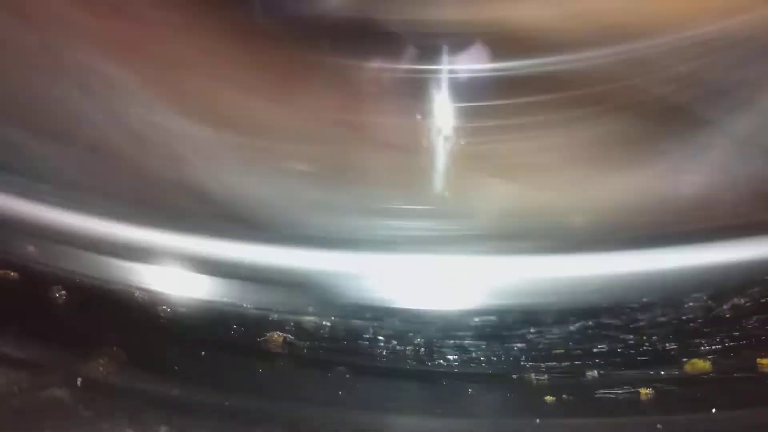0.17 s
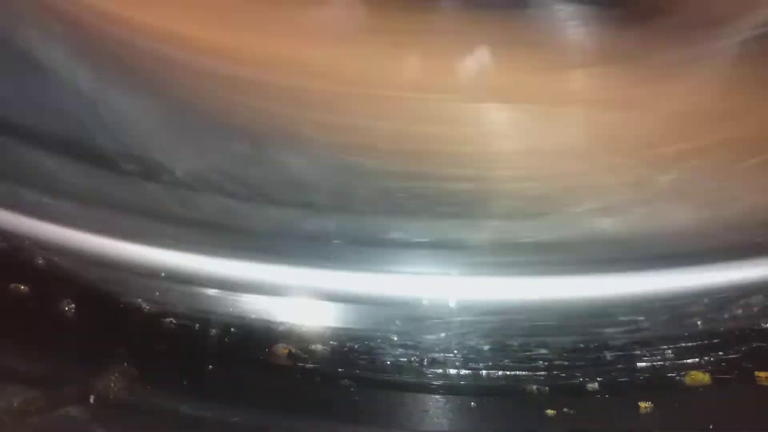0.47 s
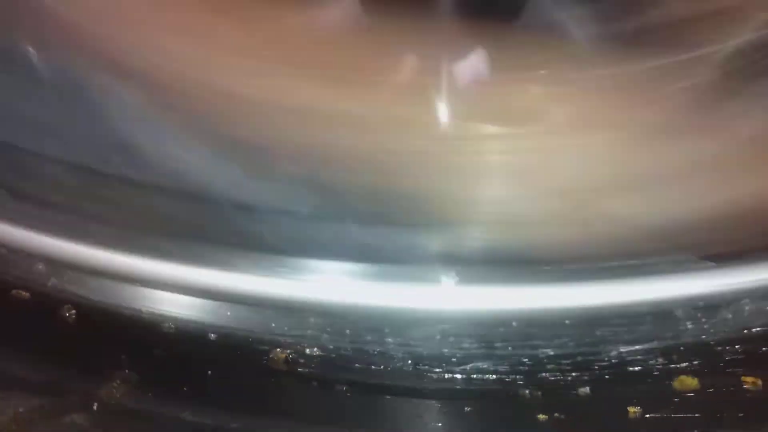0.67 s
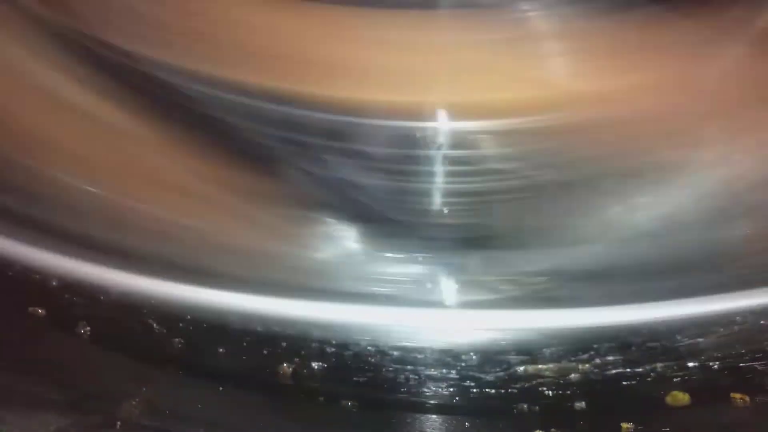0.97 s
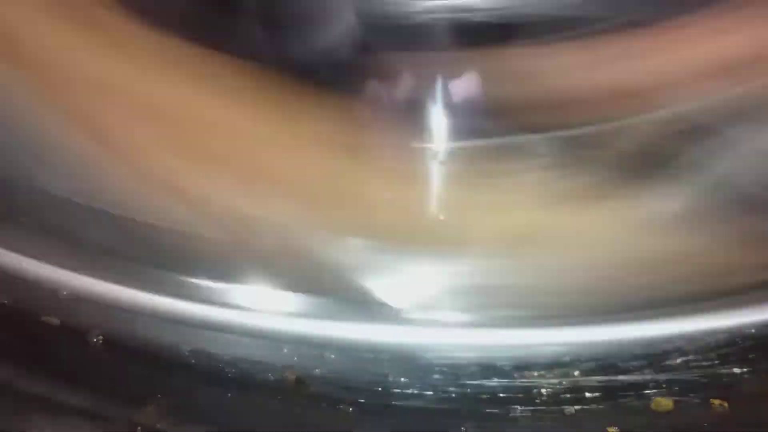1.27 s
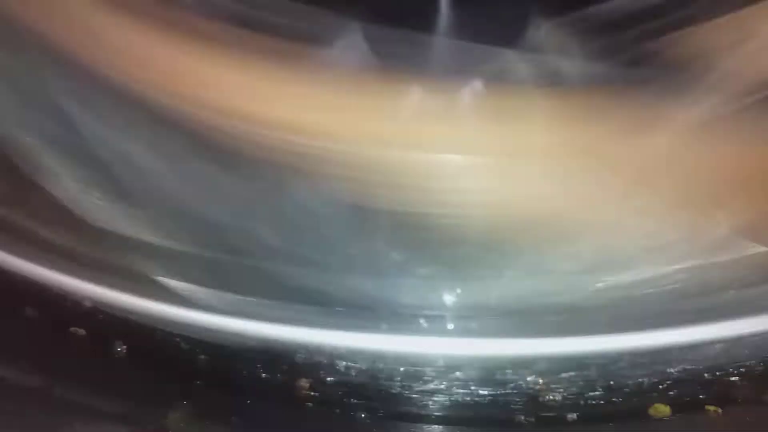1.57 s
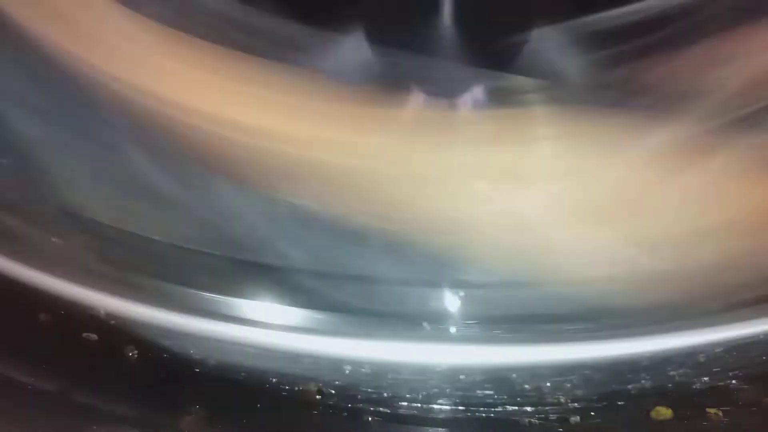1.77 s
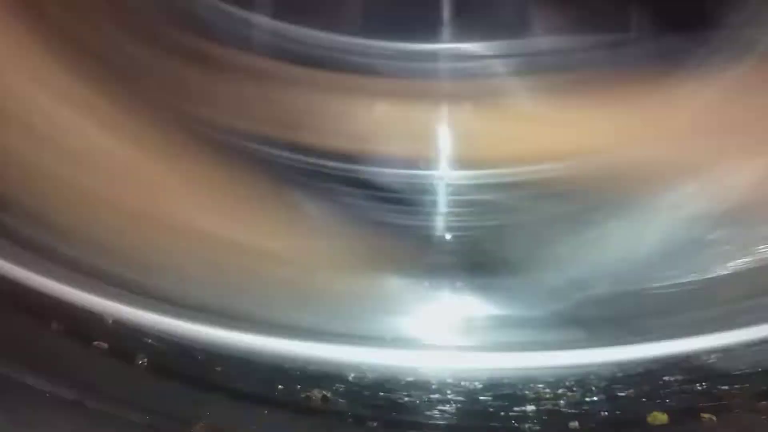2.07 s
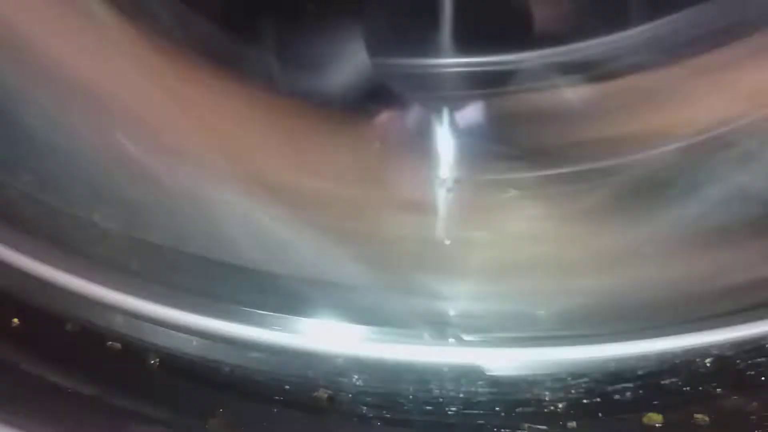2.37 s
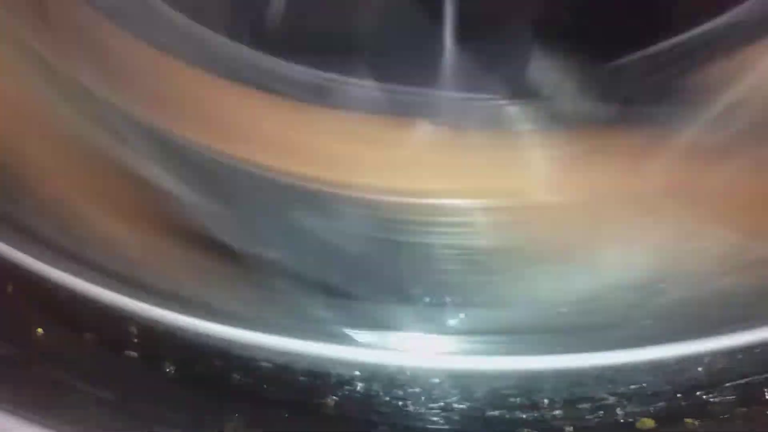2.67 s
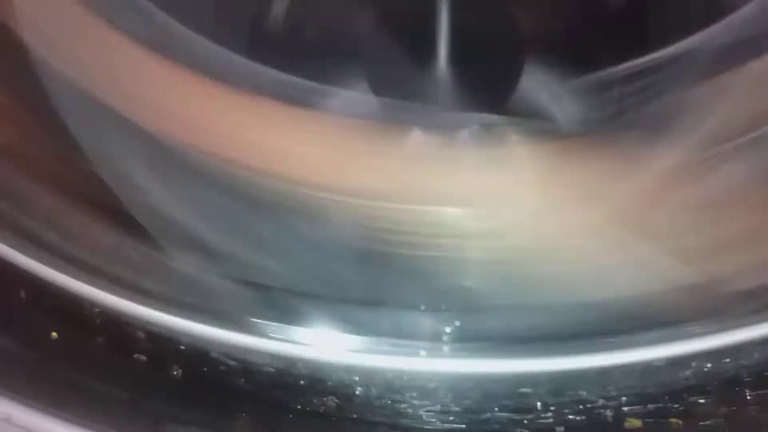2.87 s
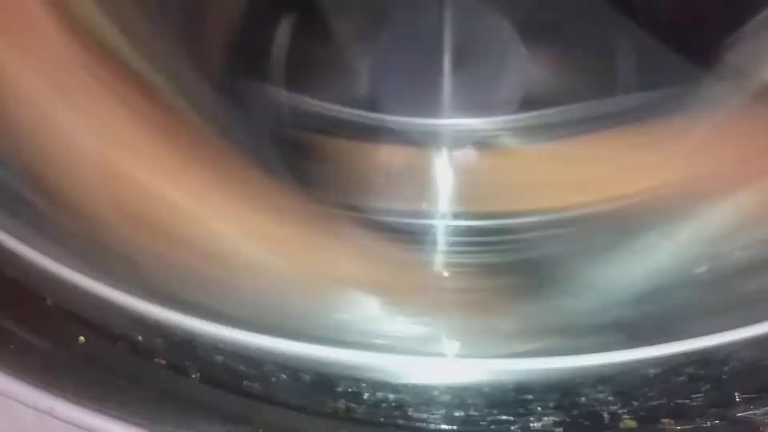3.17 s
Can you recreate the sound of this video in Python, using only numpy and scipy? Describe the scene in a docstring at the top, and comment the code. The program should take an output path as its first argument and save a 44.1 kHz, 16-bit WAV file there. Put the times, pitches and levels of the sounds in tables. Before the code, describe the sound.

Close over the rim of a steel honey extractor, mono: continuous droning hum and whirr pulsing with each turn, irregular small ticks and faint rattle, heavy low air buffeting mostly in the middle, easing later.

```python
"""The drive gear of a honey extractor hums as two sines, bent and swelled alike on each of about four turns a second.
Its roughness, noise that partly repeats each turn, rings the steel drum's resonances, heard from just over the rim.
Two frames whirr past as banded noise that swells with the turn, and tick and rattle as short ringing noise puffs.
Stirred air buffets the microphone with lumpy low noise and one-cycle thumps; the electronics whine as faint sines."""
import sys
import numpy as np
from scipy import signal
from scipy.fft import rfft, irfft
from scipy.io import wavfile

SR = 44100
rng = np.random.default_rng(int(sys.argv[2]) if len(sys.argv) > 2 else 0)


def generate_wav(sig):
    """Save sig (samples, or channels by samples) to the path in sys.argv[1] as 16-bit PCM at SR."""
    pcm = np.round(np.clip(np.atleast_2d(sig).T, -1, 1) * 32767).astype(np.int16)
    wavfile.write(sys.argv[1], SR, pcm)


def elevation(decibels):
    """Turn decibel levels (scalar or array-like) into linear amplitude ratios."""
    levels = np.asarray(decibels, float)
    return 10 ** (levels / 20)


N = 146853  # length in samples
TURNS_PER_S = 4.111

# electrical whine: multiple of WHINE_HZ, level_db (rms)
WHINE = [(1, -50.5), (2, -63), (4, -66), (5, -69), (6, -69), (7, -79), (11, -86), (13, -81), (14, -80),
         (15, -85)]
WHINE_HZ = 1000

# buffeting air on the microphone: time_s, deep_level_db, upper_level_db
WIND = [(0.0, -34.5, -35), (0.3, -35, -37.5), (0.5, -34, -34.5), (0.75, -26.5, -28.5), (0.95, -28, -29.5),
        (1.15, -26.5, -24.5), (1.33, -25, -28.5), (1.38, -40, -34.5), (1.47, -37, -33.5),
        (1.62, -30.5, -30), (1.75, -28.5, -34), (1.87, -28, -24.5), (1.94, -41, -34), (2.05, -27.5, -33),
        (2.25, -33.5, -35), (2.5, -31.5, -37), (2.8, -44.5, -40), (2.9, -38, -33.5), (3.02, -34, -45.5),
        (3.12, -41, -37), (3.33, -43, -53)]
# spectrum of the buffeting: pitch_hz, relative level_db (per Hz)
WIND_COLOUR = [(15, -58), (25, -31), (56, -0.5), (86, 2.5), (130, -0.5), (305, -6), (372, -12), (403, -22),
               (436, -9), (600, -12.5), (780, -31), (1320, -120)]
WIND_SPLIT_HZ, WIND_LUMP_DB, LUMP_RATE_HZ = 105, 0.5, 82

# single eddies thumping the microphone: centre_s, level_db (top of the envelope), pitch_hz
THUMPS = [(0.109, -18, 105), (.639, -18, 120), (0.668, -25, 115), (.736, -14, 96), (0.754, -22, 84),
          (0.777, -21, 116), (0.829, -11.5, 133), (.878, -16.5, 142), (0.921, -21, 147),
          (0.968, -13.5, 120), (1.012, -23, 100), (1.033, -22, 106), (1.083, -13, 100), (1.104, -13.5, 104),
          (1.124, -19, 122), (1.174, -12.5, 134), (1.21, -17.5, 105), (1.284, -14, 112),
          (1.306, -10.5, 134), (1.338, -21, 144), (1.421, -13, 120), (1.508, -13.5, 127), (1.545, -16, 146),
          (1.633, -24, 121), (1.717, -13.5, 96), (1.81, -12.5, 142), (1.864, -15.5, 178),
          (1.89, -18.5, 126), (1.966, -14.5, 112), (2.002, -20, 124), (2.163, -16.5, 134),
          (2.203, -25, 100), (2.228, -20.5, 137), (2.35, -16.5, 164), (2.361, -22, 111), (2.391, -27, 101),
          (2.456, -18, 123), (2.947, -24, 128), (2.995, -22, 88), (3.024, -23, 90.5), (3.24, -21, 90),
          (3.285, -22, 88)]
THUMP_RISE_CYCLES, THUMP_FALL_CYCLES = 1.05, 1.8

# clear frame ticks: start_s, level_db (of the click, before gain and ringing), top_db (treble against level_db)
TICKS = [(0.1074, -29, -4), (0.3945, -30, -9), (0.5905, -24, -11), (0.8305, -22, -17), (1.0051, -24.5, -14),
         (1.071, -21.5, -14), (1.1414, -28, -6), (1.3004, -29, -20), (1.5389, -19, -21), (1.701, -29, -11),
         (1.782, -19, -21), (2.1644, -36, -1), (2.5494, -21, -23), (2.779, -24, -17), (2.984, -20, -26),
         (3.024, -26, -12), (3.1073, -36, -1)]
TICK_GAIN_DB, TICK_RISE_S, TICK_FALL_S, TOP_FALL_S = -3, 0.00072, 0.0056, 0.0053
TICK_HZ, TICK_WIDTH_HZ, TOP_HZ, TOP_WIDTH_HZ = 4930, 1900, 13300, 3500
RATTLE_PER_S, RATTLE_FLOOR_DB, RATTLE_SPREAD_DB, RATTLE_FALL_S = 43, -51, 2.5, 0.0027

# spectrum of the whirr: pitch_hz, relative level_db (per Hz)
WHIRR_COLOUR = [(40, -17.5), (70, -8.5), (190, -14), (340, -16), (450, -21.5), (570, -23.5), (750, -14.5),
                (900, -18), (1400, -21), (2000, -26), (2700, -31.5), (4200, -35), (4800, -32),
                (5600, -35.5), (6400, -38.5), (7500, -51.5), (8800, -66.5), (10500, -56), (11500, -54),
                (13000, -47.5), (14500, -48), (16000, -54)]
# whirr swell as frames pass: from_hz, once_a_turn_db, peak_turn_share, twice_a_turn_db, peak_turn_share
FRAME_PASS = [(924, 0.94, 0.63, 1.5, 0.42), (1960, 0.95, 0.59, 1.43, 0.34), (3800, 0.84, 0.56, 1.5, 0.37),
              (7900, .6, 0.66, 1, 0.42)]
# slow level of the whirr's top band: time_s, level_db
TOP_LEVEL = [(0.0, 1.5), (1.6, 1.2), (2.5, 2.1), (3.0, 3.5), (3.33, 3.5)]
WHIRR_DB, WHIRR_PATCH_DB = -31, 0.7

# drum resonances: pitch_hz, width_hz, level_db (rms before swells), swell_db (once a turn), peak_turn_share;
# a negative swell dips at that share instead
DRUM = [(82.8, 27, -41, 0.5, .2), (262.8, 72, -39.5, 0.2, 0.67), (382.2, 17, -34, -1.5, 0.8),
        (414.4, 16, -37.5, 2.5, 1), (509.3, 9.5, -52, 9.5, 0.8), (590, 8.3, -57, -7.5, .9),
        (635.5, 36.5, -39.5, 5.5, 0.94), (689.5, 53, -39.5, 3, 0.82), (847.5, 48, -42, 2.5, 0.49),
        (1219, 107, -44, 1.2, .45), (1257.6, 34, -48, -1, 0.39), (1711, 170, -48.5, 0, 0.48),
        (2090, 77, -55, 5, 0.89), (2852, 84, -59.5, 9, 0.97)]
# drum resonances inside this band take the uneven ring level: low_hz, high_hz
RING_BAND_HZ = (600, 720)
REPEAT_SHARE = 0.3  # share of the roughness power that repeats every turn
# slow level of drum and whirr together: time_s, level_db
SLOW_LEVEL = [(0, -0.5), (.6, -0.4), (1.2, 0.5), (1.8, 0), (2.4, -0.56), (3.33, -1)]

# the low and high gear tone: level_db (rms before swells), waver_rad (spread of the phase)
GEAR_TONES = [(-31, 0.92), (-38.5, 0.7)]
# gear tones round one turn: turn_share, low_hz, low_db, high_hz, high_db
GEAR_ROUND = [(.02, 402, 3, 821, -14), (.10, 405, 1, 818, -6), (.19, 395, -3, 820, -3),
              (.27, 403, -1, 819, 1), (.35, 412, -3, 818, 0), (.44, 404, -3, 817, 4), (.56, 407, 1, 815, 1),
              (.65, 409, 0, 816, 2), (.76, 404, -6, 814, 1), (.84, 409, 3, 817, -6),
              (.92, 412, 2, 819, -10)]
# uneven level of the low tone, high tone and drum ring over time: time_s, low_tone_db, high_tone_db, drum_ring_db
UNEVEN_LEVEL = [(0, -.6, 1, -1.5), (.4, -1.1, 2, -1), (.85, -2, -1, 0.5), (1.3, -0.2, 1.5, 2.2),
                (1.55, -3.5, -5.5, -3.5), (1.7, 1.1, 5, 4.5), (1.85, 1.5, 0, -4.5), (2.1, -0.5, -1.5, 1.5),
                (2.3, 0, -.6, -.6), (2.42, 0.5, -5, -.6), (2.53, 0.5, -6, -6), (2.58, 1.5, 4, 1.5),
                (2.69, 3.5, -5, -3.5), (2.8, -5, -7, 4), (2.92, 4.5, 5, -1.5), (3.0, -4, -4, 2),
                (3.1, -0.2, -1.5, 0.2), (3.33, -1.5, -8, -2)]
GEAR_FLUTTER_DB = 1.2


def rms_one(x):
    """Scale to rms 1."""
    return x / np.sqrt(np.mean(x ** 2) + 1e-20)


def in_time(rows, column=1):
    """One column of a time table, drawn as a line through every sample."""
    table = np.array(rows)
    return np.interp(np.arange(N) / SR, table[:, 0], table[:, column])


def drift(rate_hz):
    """Random wander of spread 1: noise through two equal low-pass poles, made at every 40th sample."""
    pole = np.exp(-2 * np.pi * rate_hz * 40 / SR)
    noise = rng.standard_normal(N // 40 + 2002)
    slow = signal.lfilter([1], [1, -2 * pole, pole * pole], noise)[2000:]  # drop the filter's start
    return np.interp(np.arange(N) / 40, np.arange(len(slow)), rms_one(slow - slow.mean()))


def resonate(x, hz, width_hz, times=1):
    """Ring x through equal two-pole resonances in a row, each with gain 1 on top."""
    r = np.exp(-np.pi * width_hz / SR)
    poles = [1, -2 * r * np.cos(2 * np.pi * hz / SR), r * r]
    for _ in range(times):
        x = signal.lfilter([(1 - r * r) / 2, 0, (r * r - 1) / 2], poles, x)
    return x


def coloured(colour):
    """Spectrum of noise shaped by a colour table, scaled to rms 1, and its frequencies."""
    hz = np.arange(N // 2 + 1) * SR / N + 1  # the 1 keeps the logarithm finite
    pitch_hz, level_db = np.transpose(colour)
    shape = elevation(np.interp(np.log(hz), np.log(pitch_hz), level_db))
    noise = irfft(rfft(rng.standard_normal(N)) * shape, N)
    return rfft(rms_one(noise)), hz


def turns():
    """Basket angle in turns."""
    return TURNS_PER_S * np.arange(N) / SR


def whine():
    """Electronics leak steady thin sines at whole multiples of one pitch."""
    t, out = np.arange(N) / SR, np.zeros(N)
    for multiple, level_db in WHINE:
        cycles = multiple * WHINE_HZ * t + rng.random()
        out += np.sqrt(2) * elevation(level_db) * np.sin(2 * np.pi * cycles)
    return out


def wind():
    """Air hitting the microphone port makes lumpy low noise, in a deep and an upper part."""
    spectrum, hz = coloured(WIND_COLOUR)
    deep_share = 1 / (1 + (hz / WIND_SPLIT_HZ) ** 6)
    deep = rms_one(irfft(spectrum * deep_share, N))
    upper = rms_one(irfft(spectrum * (1 - deep_share), N))
    lumps = elevation(WIND_LUMP_DB * drift(LUMP_RATE_HZ))
    return lumps * (elevation(in_time(WIND)) * deep + elevation(in_time(WIND, 2)) * upper)


def thumps():
    """Each eddy is a push of about one cycle that rises faster than it dies."""
    out, t = np.zeros(N), np.arange(N) / SR
    for centre_s, level_db, hz in THUMPS:
        near = slice(int((centre_s - 0.05) * SR), int((centre_s + 0.1) * SR))
        cycles = (t[near] - centre_s) * hz
        spread = np.where(cycles < 0, THUMP_RISE_CYCLES, THUMP_FALL_CYCLES)
        envelope = np.exp(-2 * (cycles / spread) ** 2)
        out[near] += elevation(level_db) * envelope * np.cos(2 * np.pi * (cycles + rng.random()))
    return out


def puffs(clicks, fall_s):
    """Each click starts a short puff of noise that rises fast and dies."""
    rise, fall = np.exp(-1 / (TICK_RISE_S * SR)), np.exp(-1 / (fall_s * SR))
    dying = signal.lfilter([1], [1, -fall], clicks + 1e-18)  # tiny offset: never quite zero
    return signal.lfilter([1 - rise], [1, -rise], dying) * rng.standard_normal(N)


def ticks():
    """Frames shift in the basket: clear ticks and a faint random rattle ring a middle and a top resonance."""
    start_s, level_db, top_db = np.transpose(TICKS)
    at = (start_s * SR).astype(int)
    middle, top = np.zeros((2, N))
    middle[at] = elevation(level_db + TICK_GAIN_DB)
    top[at] = elevation(level_db + top_db + TICK_GAIN_DB)
    rattle_db = RATTLE_FLOOR_DB + RATTLE_SPREAD_DB * np.minimum(rng.exponential(1, N), 4)
    rattle = puffs((rng.random(N) < RATTLE_PER_S / SR) * elevation(rattle_db), RATTLE_FALL_S)
    body = resonate(puffs(middle, TICK_FALL_S) + rattle, TICK_HZ, TICK_WIDTH_HZ, times=3)
    edge = resonate(puffs(top, TOP_FALL_S) + rattle, TOP_HZ, TOP_WIDTH_HZ, times=2)
    return body + edge


def whirr():
    """Air and bearing noise; the upper bands swell as the frames pass and flutter partly together."""
    spectrum, hz = coloured(WHIRR_COLOUR)
    edges_hz = [row[0] for row in FRAME_PASS] + [SR]
    angle, together = turns(), drift(26)
    out = irfft(spectrum * (hz < edges_hz[0]), N)  # the low band does not swell with the turn
    for (low, once_db, once_at, twice_db, twice_at), high in zip(FRAME_PASS, edges_hz[1:]):
        swell_db = once_db * np.cos(2 * np.pi * (angle - once_at))
        swell_db += twice_db * np.cos(4 * np.pi * (angle - twice_at))
        swell_db += WHIRR_PATCH_DB * (together + 1.2 * drift(32))
        if high == SR:
            swell_db += in_time(TOP_LEVEL)
        out += elevation(swell_db) * irfft(spectrum * (hz >= low) * (hz < high), N)
    return elevation(WHIRR_DB) * out


def drum():
    """Gear roughness, partly the same every turn; neighbouring resonances ring from two unrelated noises."""
    turn_samples = int(SR / TURNS_PER_S)
    worn = np.array([np.resize(one_turn, N) for one_turn in rng.standard_normal((2, turn_samples))])
    fresh = rng.standard_normal((2, N))
    rough = np.sqrt(REPEAT_SHARE) * worn + np.sqrt(1 - REPEAT_SHARE) * fresh
    out, angle, ring_db = np.zeros(N), turns(), in_time(UNEVEN_LEVEL, 3)
    for k, (hz, width_hz, base_db, swell_db, peak_at) in enumerate(DRUM):
        level_db = base_db + swell_db * np.cos(2 * np.pi * (angle - peak_at))
        if RING_BAND_HZ[0] < hz < RING_BAND_HZ[1]:
            level_db = level_db + ring_db
        out += elevation(level_db) * rms_one(resonate(rough[k % 2], hz, width_hz, times=2))
    return out


def gear():
    """Meshing teeth give two tones that bend and swell the same way each turn, with uneven level and flutter."""
    angle, table, out = turns(), np.array(GEAR_ROUND), np.zeros(N)
    for k, (base_db, waver_rad) in enumerate(GEAR_TONES):
        hz = np.interp(angle, table[:, 0], table[:, 2 * k + 1], period=1)
        swell_db = np.interp(angle, table[:, 0], table[:, 2 * k + 2], period=1)
        phase = 2 * np.pi * np.cumsum(hz) / SR + waver_rad * drift(3.3)
        level_db = base_db + swell_db + in_time(UNEVEN_LEVEL, k + 1) + GEAR_FLUTTER_DB * drift(24)
        out += np.sqrt(2) * elevation(level_db) * np.sin(phase)
    return out


def scene():
    """All sources, mono."""
    machine = gear() + elevation(in_time(SLOW_LEVEL)) * (drum() + whirr())
    air = wind() + thumps()
    return (machine + ticks() + air + whine())[None]


def top_cut(x):
    """Nothing passes above the cut-off."""
    return signal.sosfilt(signal.butter(12, 15735, fs=SR, output="sos"), x)


def record(dry):
    """The microphone loses the deepest bass, below 53 Hz, and rounds the peaks towards full scale."""
    bass_cut = signal.butter(3, 53, "high", fs=SR, output="sos")
    mix = np.tanh(signal.sosfilt(bass_cut, dry))
    return top_cut(mix)


dry = scene()
out = record(dry)
generate_wav(out)
```